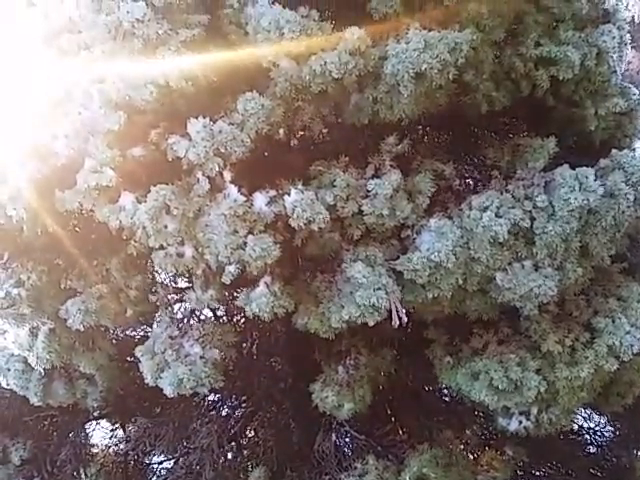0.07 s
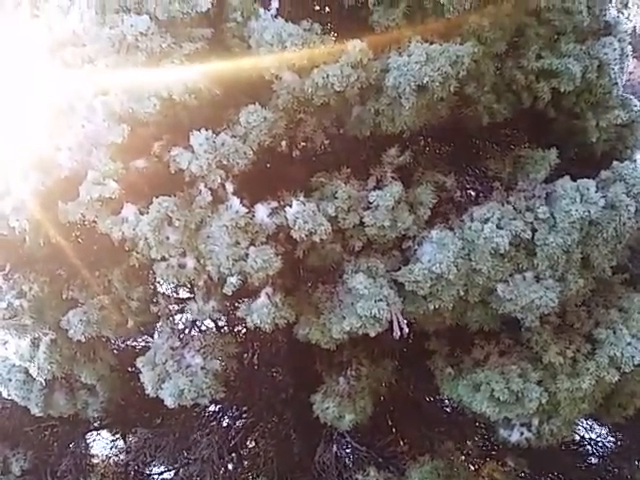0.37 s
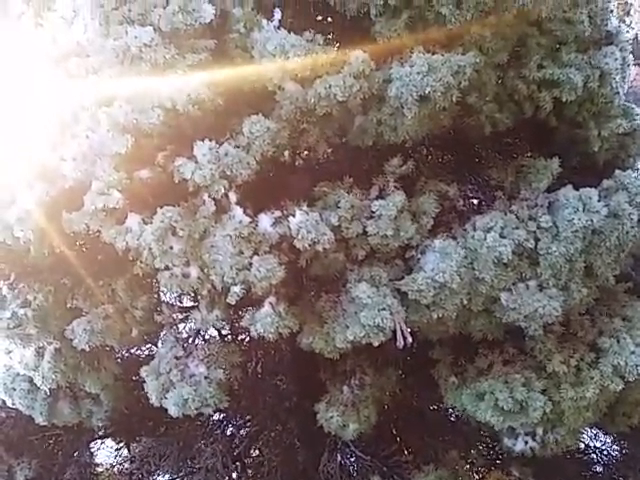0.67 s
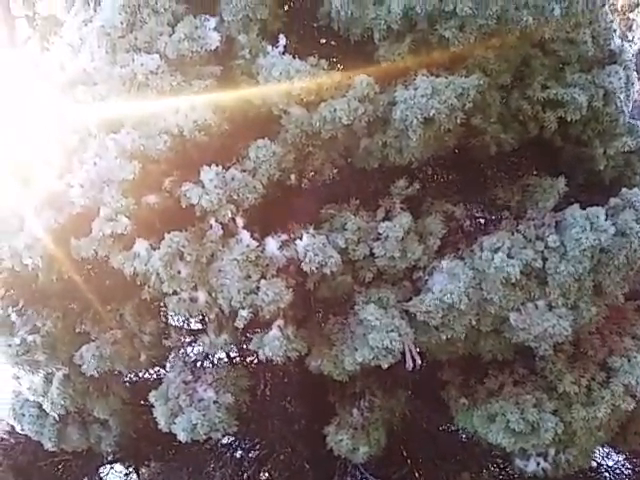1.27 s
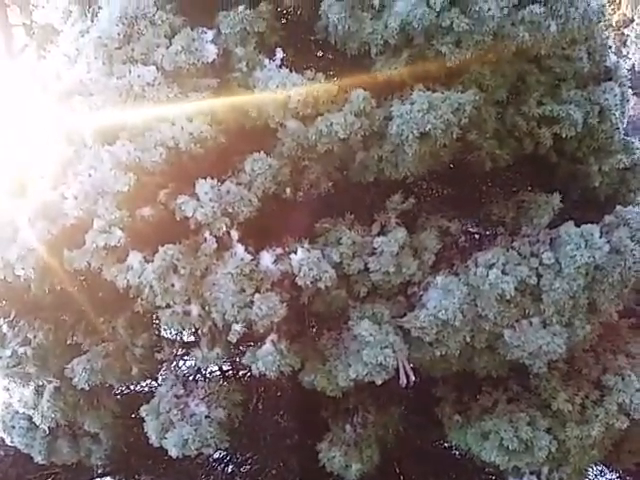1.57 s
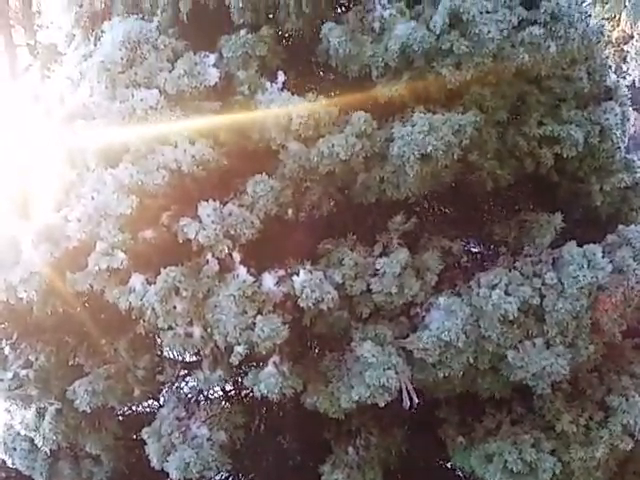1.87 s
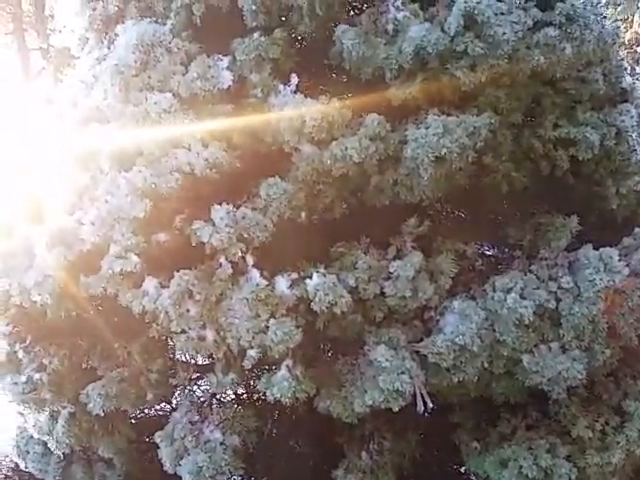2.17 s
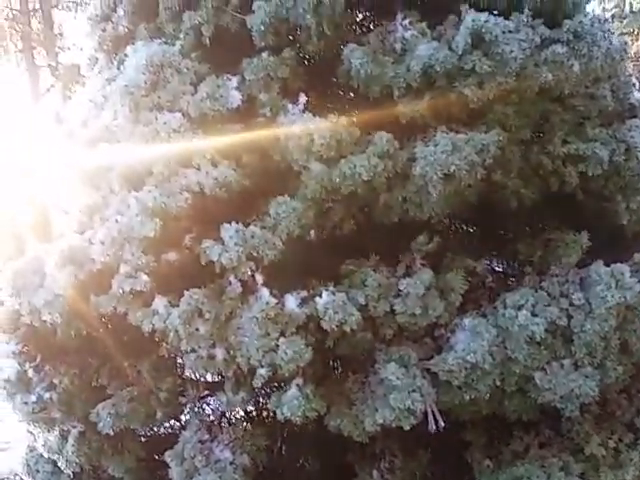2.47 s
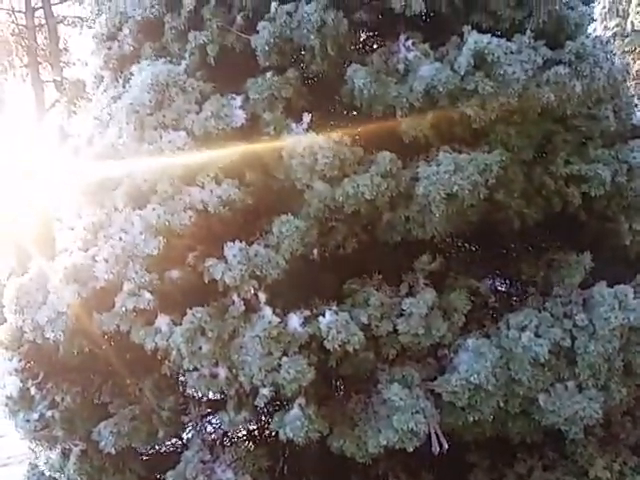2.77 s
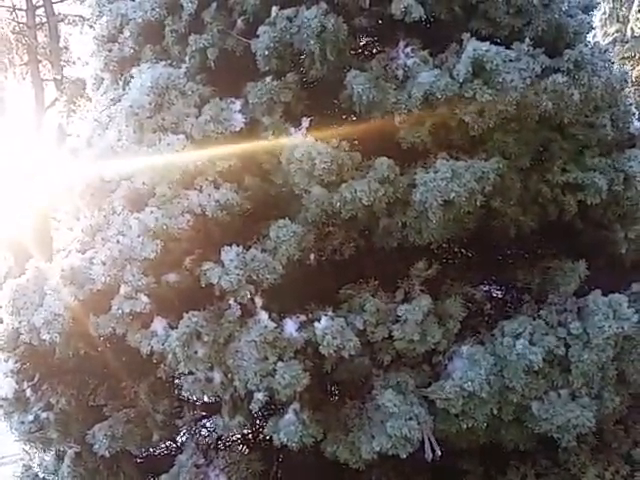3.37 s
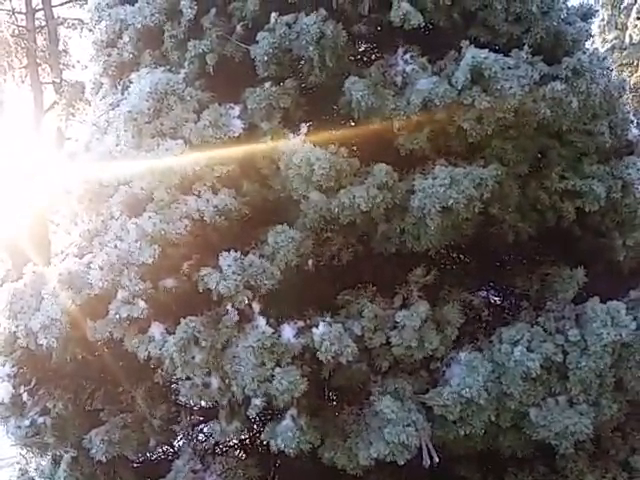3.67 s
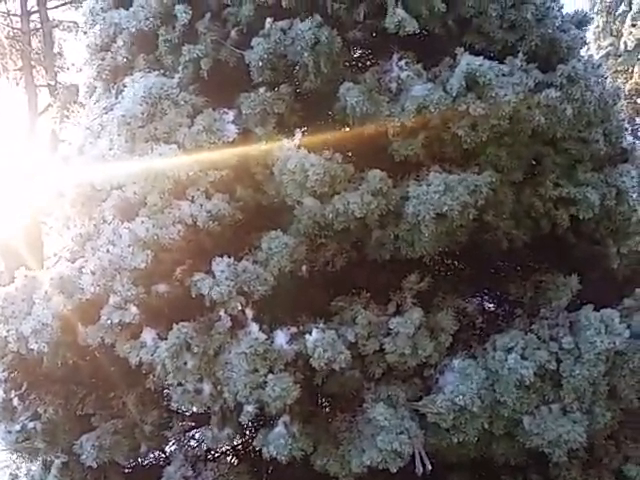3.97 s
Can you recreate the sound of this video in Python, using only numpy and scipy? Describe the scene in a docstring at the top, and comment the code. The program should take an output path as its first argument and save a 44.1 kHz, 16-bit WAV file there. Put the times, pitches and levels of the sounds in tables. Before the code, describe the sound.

Soft wind blows through a stand of evergreens, with needles hissing mostly on the right and low buffeting on the microphone. In the second half a far-off bird whistles twice, the later call quavering and echoing among the trees.

```python
"""A stand of evergreens in a breeze: the crowns rush and the needles hiss, mostly on the right,
over a low far-off rumble with a soft hum. Turbulent air buffets both microphone ports; gusts catch
the left one, hardest at about two seconds, and a soft thud of air later reaches both.
A distant bird, perhaps a hawk, gives a faint falling whistle, then a clearer one that flicks up,
quavers and turns hoarse; both scatter among the trees."""
import sys
import numpy as np
from scipy import signal
from scipy.fft import rfft, irfft
from scipy.io import wavfile

SR = 44100
rng = np.random.default_rng(int(sys.argv[2]) if len(sys.argv) > 2 else 0)


def unload_wav(signal):
    """Save mono or channel-first audio to the path in sys.argv[1] as 16-bit WAV at rate SR, clipped to [-1, 1]."""
    wavfile.write(
        sys.argv[1],
        SR,
        np.round(np.clip(np.atleast_2d(signal).T, -1, 1) * 32767).astype(np.int16),
    )


N = 176400
TIME = np.arange(N) / SR
BINS_HZ = np.maximum(np.arange(N // 2 + 1) * SR / N, 1)

# swell of the far rumble: t/s, level/dB
RUMBLE_SWELL = [(0, -54), (.4, -54), (.6, -53.5), (.95, -51), (1.45, -51.5), (1.85, -50), (2.35, -50),
                (2.7, -55.5), (3.1, -52), (3.38, -53.5), (3.46, -51.5), (3.56, -54), (3.85, -52),
                (4, -50.5)]
# swell of the rush in the crowns: t/s, relative level/dB
RUSH_SWELL = [(0, -64), (.3, -64.5), (.6, -63.5), (1.25, -62), (1.6, -63), (2.0, -60), (2.35, -60.5),
              (2.57, -62), (2.8, -64.5), (3.02, -64.5), (3.38, -61.5), (3.62, -63), (4, -62)]


def from_db(db):
    """Amplitude ratio of a level: tenfold for every 20 dB."""
    return 10 ** (np.asarray(db) / 20)


def unit_rms(x):
    """Normalisation to unit mean power."""
    return x / np.sqrt(np.mean(x ** 2) + 1e-30)


def in_time(rows):
    """Linear interpolation of each column after t/s at every sample."""
    times, *columns = np.transpose(rows)
    return [np.interp(TIME, times, column) for column in columns]


def gate(start, end, edge_s):
    """Trapezoidal envelope: one from start to end, with ramps outside."""
    return np.clip(1 + np.minimum(TIME - start, end - TIME) / edge_s, 0, 1)


def noise(gain):
    """Spectral shaping of white noise by a gain at each frequency; rms 1."""
    return unit_rms(irfft(rfft(rng.standard_normal(N)) * gain, N))


def coloured_noise(spectrum):
    """Noise whose spectral level is interpolated over log frequency; rms 1."""
    hz, db = np.transpose(spectrum)
    return noise(from_db(np.interp(np.log(BINS_HZ), np.log(hz), db)))


def band_noise(hz, half_width_hz):
    """Noise under a Lorentzian amplitude peak; rms 1."""
    return noise(1 / (1 + ((BINS_HZ - hz) / half_width_hz) ** 2))


def drift(hz):
    """Low-pass random modulation, mostly slower than hz; rms 1."""
    return band_noise(0, hz)


def flutter(hz):
    """Band-pass random modulation, swinging loosely around hz; rms 1."""
    return band_noise(hz, hz / 2)


def from_the_right(x, lag_s=.0005):
    """Path difference: sound from the right reaches the left port later."""
    return np.array([np.interp(TIME - lag_s, TIME, x), x])


def far_rumble():
    """Coherent low noise: one distant, swelling sound arrives at both ports."""
    # rumble spectrum: f/Hz, relative level/dB
    spectrum = [(15, -9.5), (38, -3.5), (75, 0), (130, -3), (175, -4), (250, -9.5), (400, -15.5),
                (800, -32.5), (1600, -66), (5000, -81)]
    level_db, = in_time(RUMBLE_SWELL)
    return from_the_right(from_db(level_db) * coloured_noise(spectrum))


def far_hum():
    """Narrow-band noise is heard as wavering pitch: a low drone and three weaker bands above it."""
    # swell of the drone: t/s, level/dB
    drone_swell = [(0, -60), (.65, -59), (.97, -54), (1.45, -56), (2.2, -58), (2.6, -61.5), (3.1, -61),
                   (3.5, -59), (4, -57.5)]
    # upper bands: f/Hz, half-width/Hz, mean level/dB
    hum_bands = [(186.5, 5.4, -67), (228.1, 9.8, -66), (323.2, 4, -70.5)]
    drone_db, rush_db = in_time(drone_swell) + in_time(RUSH_SWELL)
    drone = from_db(drone_db) * band_noise(134.8, half_width_hz=6.2)
    upper = sum(from_db(db) * band_noise(hz, half_width) for hz, half_width, db in hum_bands)
    swell_db = .69 * (rush_db - rush_db.mean())   # partly follows the crowns
    return from_the_right(drone + upper * from_db(swell_db))


def buffeting():
    """Turbulent pressure is local: each port has its own lumpy low noise, swelling with the rumble."""
    # pressure spectrum: f/Hz, relative level/dB
    spectrum = [(10, -16), (25, -1.5), (42, -1.5), (85, 3), (130, -8), (250, -13.5), (600, -64),
                (3000, -82)]
    rumble_db, = in_time(RUMBLE_SWELL)
    swell_db = .8 * (rumble_db - rumble_db.mean())
    port_db, lump_db = (-59.5, -63), 2.5
    return np.array([coloured_noise(spectrum) * from_db(db + swell_db + lump_db * drift(hz=10))
                     for db in port_db])


def gusts():
    """Bursts of turbulence build up on the left port alone and drop away."""
    # gusts: start t/s, end t/s, start level/dB, end level/dB
    bursts = [(0.346, 0.413, -47, -46.5), (1.687, 1.897, -43.5, -43), (1.954, 2.004, -41, -34)]
    # gust spectrum: f/Hz, relative level/dB
    spectrum = [(10, -19), (25, -5), (42, -1.5), (80, -6.5), (140, -7), (200, -14.5), (280, -26.5),
                (600, -57), (3000, -100)]
    envelope = np.zeros(N)
    for start, end, start_db, end_db in bursts:
        level_db = np.interp(TIME, [start, end], [start_db, end_db])
        envelope += gate(start, end, edge_s=.0186) * from_db(level_db)
    return np.array([envelope * coloured_noise(spectrum), np.zeros(N)])


def air_thud(at_s=3.485, spread_s=.026, port_db=(-44.5, -47)):
    """A pressure pulse on both ports: low noise under a brief Gaussian envelope."""
    envelope = np.exp(-((TIME - at_s) / spread_s) ** 2)
    push = unit_rms(envelope * band_noise(110, half_width_hz=27)) * np.sqrt(np.mean(envelope ** 2))
    return from_db(port_db)[:, None] * from_the_right(push)


def wind_in_trees():
    """Flow noise, incoherent between the ports: the crowns rush smoothly, the needles' hiss flutters."""
    # flow noise spectrum at each port: f/Hz, relative level/dB
    left_spectrum = [(150, -99.5), (400, -89.5), (600, -94), (900, -91.5), (1800, -109), (2400, -110),
                     (2900, -116), (4000, -113), (5500, -120), (6000, -127), (6500, -120), (7700, -127),
                     (8300, -132), (10000, -132), (11500, -121), (13400, -114), (15600, -111)]
    right_spectrum = [(150, -89), (400, -87), (900, -83), (1300, -90.5), (1850, -102), (2250, -97),
                      (2550, -97.5), (2900, -109.5), (3500, -103), (3900, -91.5), (4250, -92), (4700, -98),
                      (4950, -90.5), (5160, -88), (5350, -96.5), (5600, -101), (5980, -112), (6400, -94),
                      (7100, -106), (7850, -112), (8300, -135), (10000, -131), (10500, -122), (11100, -125),
                      (11750, -115), (12400, -121), (13450, -106), (14650, -113), (15450, -102)]
    # swell of the hiss: t/s, relative treble level/dB, relative top treble level/dB
    hiss_swell = [(0, -72, -84), (.08, -69.5, -83), (.45, -69, -79.5), (.65, -69.5, -81),
                  (.9, -65.5, -79.5), (1.14, -65.5, -77), (1.31, -65.5, -77.5), (1.36, -66.5, -79.5),
                  (1.55, -68.5, -81.5), (1.98, -65.5, -77), (2.14, -66, -79), (2.38, -64, -77.5),
                  (2.59, -64.5, -75.5), (2.63, -67, -80.5), (2.85, -69, -83), (2.96, -68, -82),
                  (3.02, -72, -84), (3.05, -66, -80), (3.14, -68, -83), (3.28, -65.5, -79.5),
                  (3.73, -68, -81.5), (3.96, -65.5, -79)]
    # lower edges of the hiss bands, with the rush below the first: f/Hz
    band_edges = [1600, 3400, 4650, 5900, 8500]
    # random fluctuation of each hiss band, low to high: rms level deviation/dB
    band_deviations = [0.31, 0.3, 1.54, 1.83, 1.1]
    port_db, port_flutter_db, rustle_db = (-61.5, -54), (0, .74), 1.36

    rush_db, treble_db, top_db = [db - db.mean() for db in in_time(RUSH_SWELL) + in_time(hiss_swell)]
    band_swells_db = [(rush_db + treble_db) / 2, treble_db, treble_db, treble_db, top_db]
    band_of_bin = np.searchsorted(band_edges, BINS_HZ)
    ports = []
    for spectrum, level_db, flutter_db in zip((left_spectrum, right_spectrum), port_db, port_flutter_db):
        flow = rfft(coloured_noise(spectrum))
        rush, *bands = [irfft(flow * (band_of_bin == k), N) for k in np.unique(band_of_bin)]
        hiss = sum(band * from_db(swell_db + deviation_db * drift(hz=34))
                   for band, swell_db, deviation_db in zip(bands, band_swells_db, band_deviations))
        hiss *= from_db(flutter_db * flutter(hz=18) + rustle_db * drift(hz=160))
        ports.append(from_db(level_db) * (rush * from_db(rush_db) + hiss))
    return np.array(ports)


def forest_echoes(x, t60_s=.75, echoes_per_s=900, sway_rad=1.2):
    """Scattering by trunks and branches: decaying echoes, with a later cluster from farther trees."""
    far_db, far_delay_s, far_spread_s = -9, .24, .099
    decay = from_db(-60 * TIME / t60_s)
    far_cluster = from_db(far_db) * np.exp(-((TIME - far_delay_s) / far_spread_s) ** 2)
    arrivals = rng.random(N) < echoes_per_s / SR
    response = arrivals * rng.standard_normal(N) * (decay + far_cluster)
    scattered = signal.fftconvolve(x, response / np.sqrt(np.sum(response ** 2)))[:N]
    sway = sway_rad * drift(hz=49)   # moving branches modulate the phase and smear the pitch
    return np.real(signal.hilbert(scattered) * np.exp(1j * sway))


def whistle(contour, waver_share=.0042, rasp_share=.012, rasp_depth=.89):
    """Fast amplitude and frequency modulation gives a tone sidebands; with noise it sounds hoarse."""
    hz, level_db, hoarseness = in_time(contour)
    rasp = hoarseness * flutter(hz=150)
    pitch_swing = waver_share * drift(hz=58) + rasp_share * rasp
    phase = 2 * np.pi * np.cumsum(hz * (1 + pitch_swing)) / SR
    tone = np.sqrt(2) * np.sin(phase) * (1 - rasp_depth * rasp)
    screech_gain = hoarseness * from_db(-2)
    screech = screech_gain * band_noise(2970, half_width_hz=460)
    expected_rms = np.sqrt(1 + (rasp_depth * hoarseness) ** 2 + screech_gain ** 2)
    envelope = from_db(level_db) * gate(contour[0][0], contour[-1][0], edge_s=.026)
    return envelope * (tone + screech) / expected_rms


def bird(direct_db=(-19, -.5), echo_db=(-25, -6)):
    """Direct and scattered sound add: two whistles from the right, each echoing through the trees."""
    # one contour per whistle: t/s, f/Hz, level before the path gains/dB, hoarseness (0-1)
    contours = [
        [(2.215, 3385, -69, .5), (2.26, 3315, -68, .15), (2.31, 3240, -68, .05), (2.37, 3205, -70, 0.2),
         (2.47, 3160, -77, .3), (2.55, 3040, -79, .3)],
        [(3.047, 2500, -67, 0.64), (3.062, 3000, -69, 0.2), (3.098, 3160, -69, .02), (3.135, 3065, -58, 0.1),
         (3.165, 3040, -62, 0.1), (3.193, 3055, -56, 0.1), (3.208, 2965, -54.5, 0.14), (3.228, 3065, -56, 0.14),
         (3.25, 2985, -57.5, 0.2), (3.267, 3075, -60, 0.42), (3.284, 3005, -51, 0.2), (3.298, 2910, -56.5, 0.6),
         (3.33, 2860, -56.5, 0.8), (3.355, 2925, -57.5, 0.4), (3.395, 2805, -57, 0.96),
         (3.445, 2770, -62.5, 0.9)],
    ]
    calls = sum(whistle(contour) for contour in contours)
    direct = from_db(direct_db)[:, None] * from_the_right(calls)
    echoes = np.array([from_db(db) * forest_echoes(calls) for db in echo_db])
    return direct + echoes


def scene():
    """Superposition of all sources at the two ports, in the order left, right."""
    return wind_in_trees() + far_hum() + far_rumble() + buffeting() + gusts() + air_thud() + bird()


def record(dry, cutoff_hz=15680):
    """Band limiting: an elliptic low-pass filter cuts the top treble steeply."""
    return signal.sosfilt(signal.ellip(14, .1, 80, cutoff_hz, fs=SR, output="sos"), dry)


dry = scene()
out = record(dry)
unload_wav(out)
```